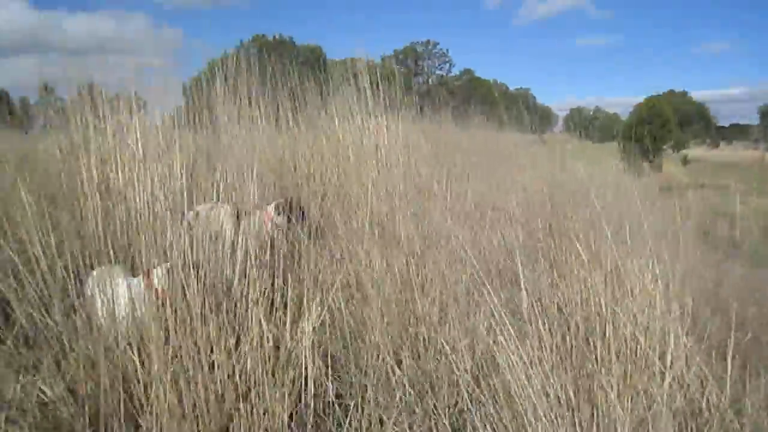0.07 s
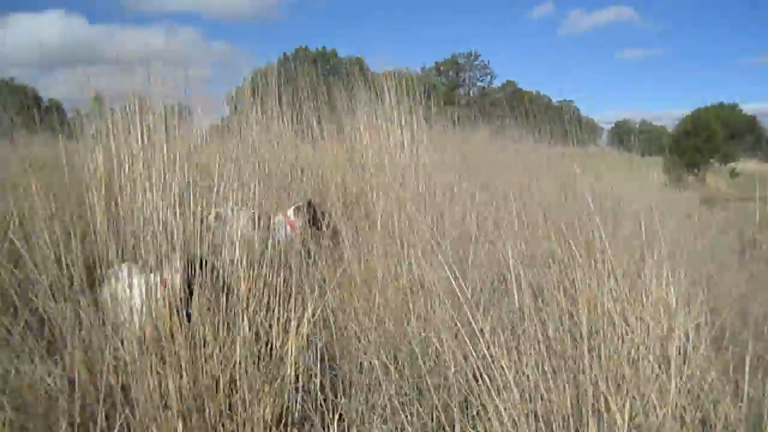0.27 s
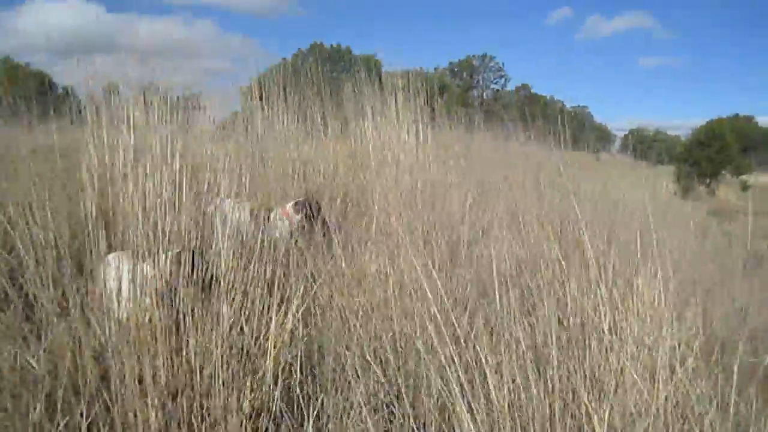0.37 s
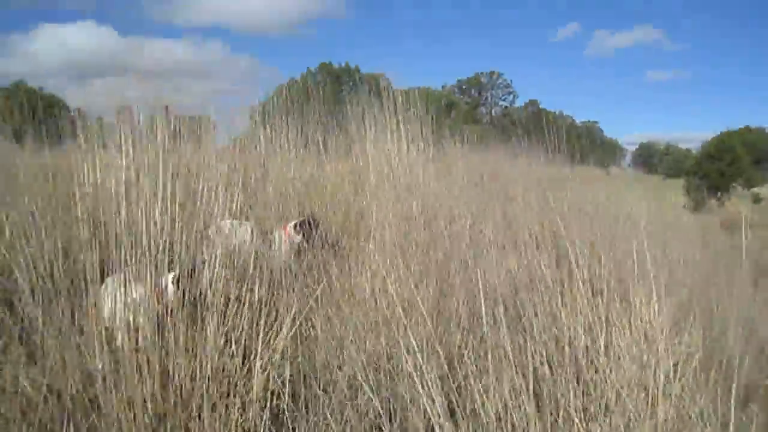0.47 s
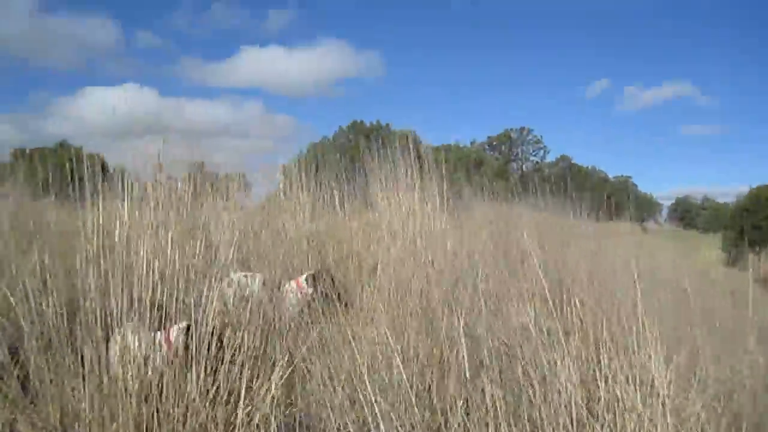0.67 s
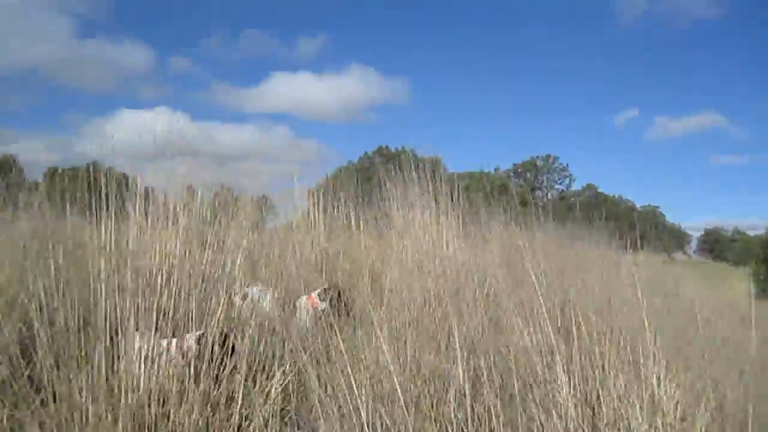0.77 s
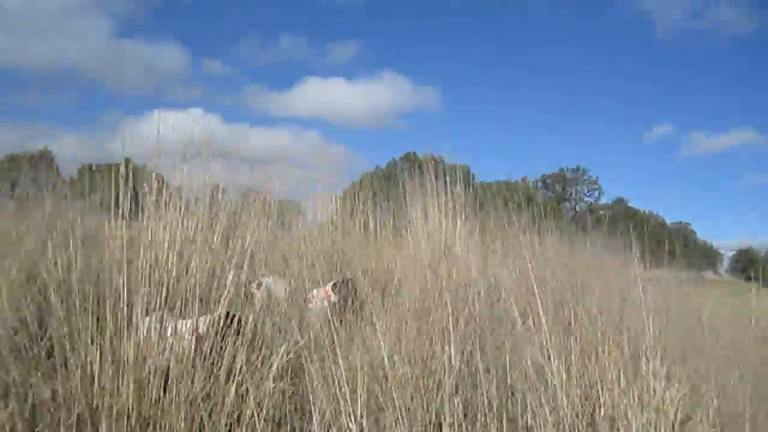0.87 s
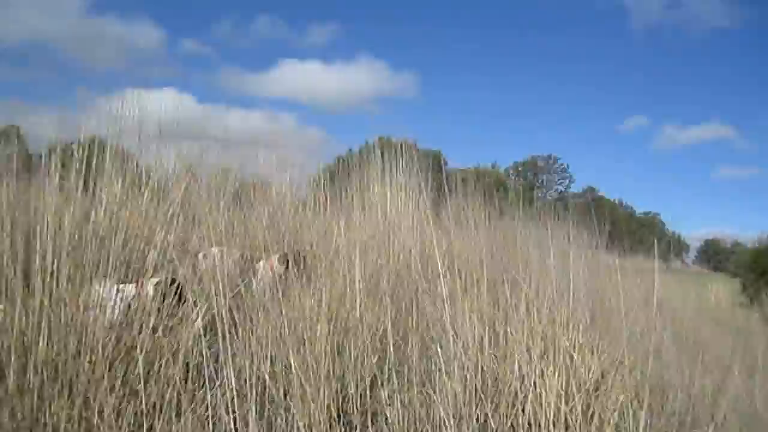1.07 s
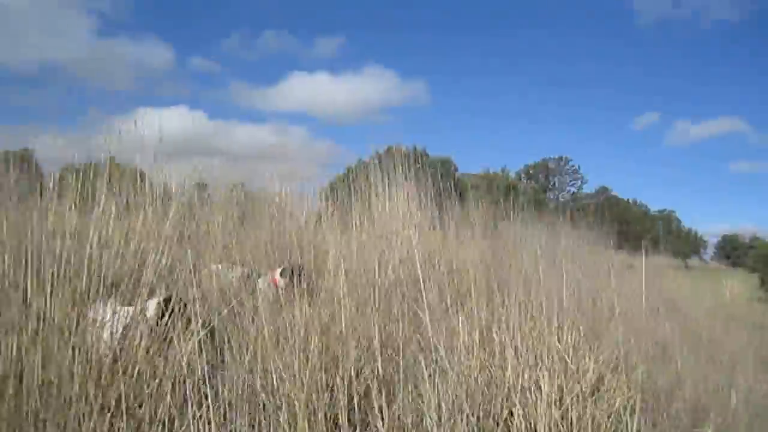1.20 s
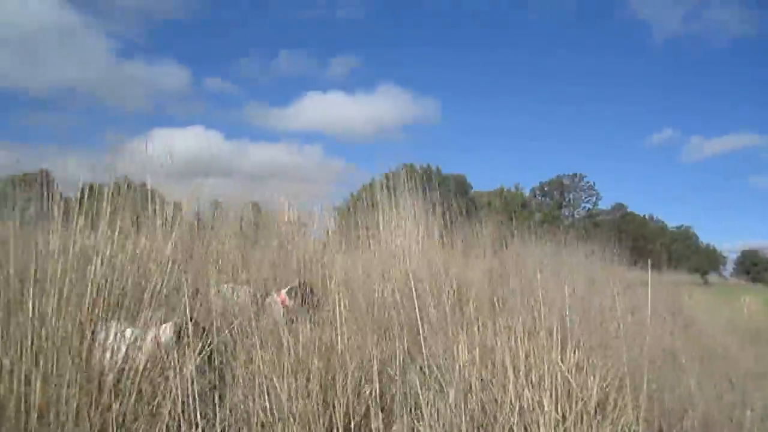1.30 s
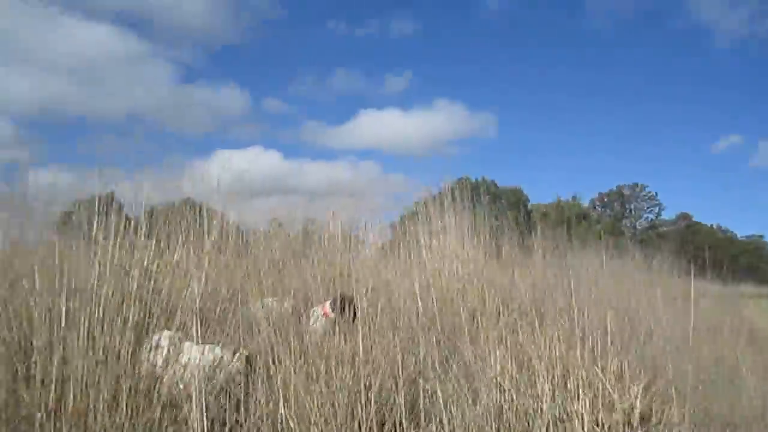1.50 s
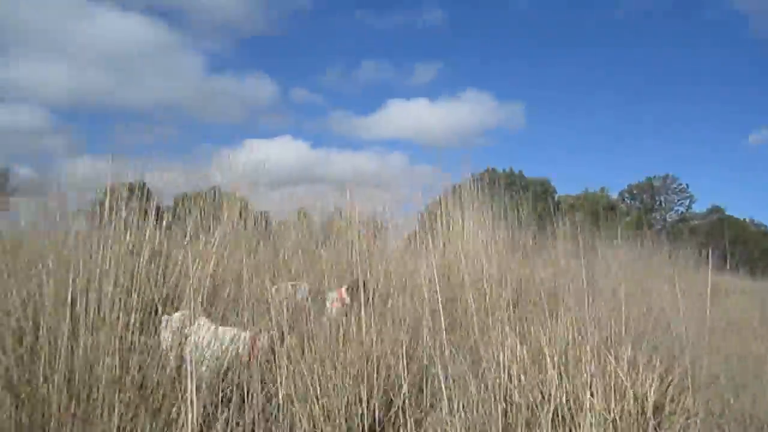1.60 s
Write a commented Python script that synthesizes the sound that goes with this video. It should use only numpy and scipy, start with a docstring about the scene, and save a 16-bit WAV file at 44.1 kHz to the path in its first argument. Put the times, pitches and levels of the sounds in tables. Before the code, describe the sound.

Wind buffets a microphone carried through tall dry grass in an open field. Stalks swish, snap and knock against the camera at first, then low, fluttering gusts come in two waves, the second stronger, before easing.

```python
"""Wind gusts break on a microphone in low, fluttering thumps: each passing eddy is a brief dip
in pressure. The microphone is on a camera carried through tall dry grass in an open field.
Behind the wind, stalks swish and dry blades crackle through countless small contacts, brittle
stalks fracture in bright snaps, and now and then a stem knocks the camera case into damped vibration."""
import sys
import numpy as np
from scipy.fft import rfft, irfft, next_fast_len
from scipy.io import wavfile
from scipy.ndimage import map_coordinates

SR = 44100
rng = np.random.default_rng(int(sys.argv[2]) if len(sys.argv) > 2 else 0)


def transcribe(signal):
    """Save signal, clipped to [-1, 1], as a 16-bit WAV file at the path in sys.argv[1]."""
    frames = np.atleast_2d(signal).T
    limited = np.clip(frames, -1, 1)
    pcm = np.round(limited * 32767).astype(np.int16)
    wavfile.write(sys.argv[1], SR, pcm)


N = 72765
T = np.arange(N) / SR

# Envelopes of the sweeping stalks and the crackling blades: time_s, relative_level_db
SWISH_ENVELOPE = [(0, -41.5), (.035, -42), (.11, -42.5), (.165, -39), (.195, -40), (.235, -40.5), (.3, -44),
                  (.45, -51), (.8, -53), (.845, -44.5), (.89, -52.5), (1.08, -46), (1.25, -50.5),
                  (1.45, -58), (1.65, -55)]
CRACKLE_ENVELOPE = [(0, -43), (.08, -45.5), (.125, -40), (.2, -50), (.4, -49.5), (.66, -51), (.8, -50.5),
                    (.92, -48), (.98, -50), (1.09, -44), (1.17, -49.5), (1.43, -53), (1.55, -52),
                    (1.65, -57)]
# Stalks breaking: start_s, relative_level_db, t60_s, pitch_hz
STALK_SNAPS = [(.0545, -22.5, 0.017, 7060), (0.109, -28.5, 0.038, 6500), (.238, -31.5, 0.045, 4100),
               (0.2564, -30, 0.011, 2500), (.346, -32, .02, 3500), (.512, -28, 0.011, 9000),
               (0.527, -36, .04, 11000), (0.62, -35, 0.027, 3900), (0.8428, -26, 0.037, 4570),
               (.917, -29.5, .035, 11000), (0.928, -27, 0.01, 7000), (1.0915, -15, 0.014, 4970),
               (1.3617, -30.5, 0.019, 9900), (1.367, -33, .02, 9400), (1.4996, -28.5, .016, 13000),
               (1.5205, -30, 0.0094, 11000)]
# Stems striking the camera: start_s, relative_level_db, most_excited_hz
STEM_KNOCKS = [(.008, -24.5, 717), (.145, -17, 505), (0.167, -23.5, 405), (.217, -25.5, 815),
               (.231, -25, 850), (.258, -18, 550), (0.293, -20, 540), (.47, -32, 445), (.997, -19.5, 830),
               (1.083, -21.5, 450), (1.481, -27, 626), (1.642, -32.5, 546)]
# Normal modes of the camera case: frequency_hz, relative_level_db, t60_s
CASE_MODES = [(216, 2.5, .05), (460, -3, 0.034), (634, -2, 0.032), (819, -6, 0.035), (1106, -6, 0.017),
              (1430, -16, 0.018)]
# Gusts on the microphone: start_s, length_s, level_db
WIND_GUSTS = [(0.153, 0.029, -33), (.232, 0.041, -29.5), (.328, 0.082, -17.5), (.547, 0.024, -28.5),
              (.598, 0.064, -24), (.705, 0.046, -33.5), (.852, .07, -17.5), (0.951, .088, -20.5),
              (1.093, 0.024, -24.5), (1.123, 0.068, -15), (1.192, 0.045, -23), (1.337, .11, -31.5),
              (1.524, 0.021, -36), (1.59, .045, -30.5)]
# The hardest eddies, each one thump: centre_s, level_db, pitch_hz
EDDY_THUMPS = [(.153, -19, 207), (.244, -13.5, 82), (0.306, -5, 140), (.331, -9.5, 188), (.342, -11, 260),
               (.389, -6.5, 302), (0.41, -10, 110), (.566, -17.5, 81), (0.615, -10, 191),
               (.651, -17.5, 167), (.865, -6.5, 224), (.879, -12.5, 110), (.904, -8, 136),
               (1.012, -13, 69.5), (1.121, -6.5, 630), (1.132, -3.5, 268), (1.15, -5, 170),
               (1.157, -6, 172), (1.179, -5.5, 342), (1.188, -7.5, 464), (1.205, -4.5, 410),
               (1.21, -8, 617), (1.23, -15.5, 457), (1.243, -14.5, 497), (1.308, -25, 248),
               (1.394, -22, 190), (1.43, -17.5, 192), (1.598, -17, 98)]
# Spectral shapes of the noise sources: frequency_hz, relative_gain_db
SWISH_SPECTRUM = [(60, -6), (200, 1.5), (450, 7), (900, 6), (1300, 2), (1800, -3), (2300, -2), (2950, -1.5),
                  (3500, -6.5), (5500, -8.5), (6500, -16.5), (16000, -31)]
CRACKLE_SPECTRUM = [(1000, -12), (3000, -4), (5000, -3.5), (8000, 1), (11500, 0), (14000, -4.5),
                    (16000, -10), (17200, -17)]
SNAP_SPECTRUM = [(300, 1.5), (900, 7.5), (1700, 3), (3000, 2), (5000, 2.5), (9000, 1.5), (13000, -1),
                 (17000, -14)]
SCRAPE_SPECTRUM = [(150, -15), (700, 0), (1500, -7), (3500, -8), (7000, -22), (16000, -32)]
RUMBLE_SPECTRUM = [(15, -12.5), (35, -2), (70, 2), (130, -6.5), (250, -10.5), (500, -23.5), (1200, -42),
                   (3000, -99)]

BAND_LIMIT_HZ = 17250
FFT_SIZE = next_fast_len(N + SR // 2)
BIN_HZ = np.fft.rfftfreq(FFT_SIZE, 1 / SR)


def amp(db):
    """Amplitude grows tenfold for every 20 dB."""
    return 10 ** (np.asarray(db) / 20)


def unit_rms(x):
    """Division by the rms gives unit power."""
    return x / np.sqrt(np.mean(x ** 2) + 1e-20)


def wobble(knots_per_s):
    """Spline interpolation of random values gives a smooth modulation."""
    return map_coordinates(rng.standard_normal(2048), [T * knots_per_s], mode="wrap")


def coloured(x, spectrum):
    """Linear filtering shapes the spectrum, with a gain that keeps the power of white noise."""
    hz, db = np.transpose(spectrum)
    gain = amp(np.interp(np.log(BIN_HZ + 1), np.log(hz), db))
    return irfft(rfft(x, FFT_SIZE) * unit_rms(gain), FFT_SIZE)[:N]


def grass_rustle(envelope, spectrum, flutter_per_s, contacts_per_s, scatter_db, contact_share):
    """Shot noise: distinct blade contacts stand out of the hiss into which countless others merge."""
    level_db = np.interp(T, *np.transpose(envelope)) + 0.65 * wobble(flutter_per_s)
    hits = rng.random(N) < contacts_per_s / SR
    contacts = hits * rng.standard_normal(N) * amp(scatter_db * np.minimum(rng.exponential(size=N), 4))
    hiss = np.sqrt(1 - contact_share) * rng.standard_normal(N)
    rustle = coloured(np.sqrt(contact_share) * unit_rms(contacts) + hiss, spectrum)
    return amp(level_db) * unit_rms(rustle)


def stalk_snaps(attack_s=0.0005, resonance_db=7, width_octaves=0.19):
    """Brittle fracture releases a short noise burst, emphasised around the stalk's own pitch."""
    out = np.zeros(N)
    hz = np.geomspace(200, BAND_LIMIT_HZ, num=60)
    base_db = np.interp(hz, *np.transpose(SNAP_SPECTRUM))
    for start_s, db, t60_s, pitch_hz in STALK_SNAPS:
        t = np.maximum(T - start_s, 0)
        burst = amp(db - 60 * t / t60_s) * (1 - np.exp(-t / attack_s)) * rng.standard_normal(N)
        peak_db = resonance_db * np.exp(-(np.log2(hz / pitch_hz) / width_octaves) ** 2)
        out += coloured(burst, np.column_stack([hz, base_db + peak_db]))
    return out


def stem_knocks(attack_s=0.00088, scrape_t60_s=0.019, fall_db_per_octave=9):
    """Impact excites the case's damped modes, most near the contact's pitch; friction adds a scrape."""
    out = np.zeros(N)
    friction = coloured(rng.standard_normal(N), SCRAPE_SPECTRUM)
    for start_s, db, contact_hz in STEM_KNOCKS:
        t = np.maximum(T - start_s, 0)
        ring = np.zeros(N)
        for hz, mode_db, t60_s in CASE_MODES:
            drive_db = rng.normal(0, 1.35) - fall_db_per_octave * abs(np.log2(hz / contact_hz))
            cycles = hz * np.exp(rng.normal(0, 0.06)) * t + rng.random()
            ring += amp(mode_db + drive_db - 60 * t / t60_s) * np.sin(2 * np.pi * cycles)
        scrape = 0.15 * amp(-60 * t / scrape_t60_s) * friction
        out += amp(db) * (ring + scrape) * (1 - np.exp(-t / attack_s))
    return out


def rumble():
    """Turbulent pressure is random, with its power concentrated at low frequencies."""
    return unit_rms(coloured(rng.standard_normal(N), RUMBLE_SPECTRUM))


def eddy(centre_s, hz, asymmetry=0.4):
    """A vortex crossing the microphone port is a pressure dip between two unequal shoulders."""
    u = np.clip(np.pi * hz * (T - centre_s), -8, 8)
    return (2 * u ** 2 - 1 + 2 * asymmetry * u) * np.exp(-u ** 2)


def eddy_train(start_s, end_s, gust_db, eddies_per_s=130, scatter_db=4, octaves_per_db=0.0624):
    """Vortex shedding makes a ragged pulse train; stronger gusts shed smaller, higher-pitched eddies."""
    hz = 133 * 2 ** (octaves_per_db * (gust_db + 21.5))  # 133 Hz for a gust of -21.5 dB
    train = np.zeros(N)
    for i, (jitter, strength, detune) in enumerate(rng.standard_normal((32, 3))):
        centre_s = start_s + (i + 0.295 * jitter) / eddies_per_s
        if centre_s < end_s:
            train += amp(scatter_db * strength) * eddy(centre_s, hz * np.exp(0.36 * detune))
    return train


def wind(breeze_db=-41.5, turbulence_db=-4.5, attack_s=0.01187, release_s=0.017):
    """Flow noise at the microphone: gusts of eddies and turbulence rise above a rumbling breeze."""
    breeze = amp(breeze_db + 2.6 * wobble(12.23)) * rumble()
    turbulence = amp(turbulence_db) * rumble()
    gusts = np.zeros(N)
    for start_s, length_s, db in WIND_GUSTS:
        end_s = start_s + length_s
        before_s, after_s = np.maximum(start_s - T, 0), np.maximum(T - end_s, 0)
        envelope = amp(-20 * (before_s / attack_s + after_s / release_s))
        eddies = envelope * eddy_train(start_s - attack_s, end_s + 2 * release_s, db)
        eddies /= np.sqrt(np.sum(eddies ** 2) / np.sum(envelope ** 2))  # same energy as the envelope
        gusts += amp(db) * (eddies + envelope * turbulence)
    thumps = sum(amp(db) * eddy(centre_s, hz) for centre_s, db, hz in EDDY_THUMPS)
    return breeze + gusts + thumps


def scene():
    """Superposition in a free field: the nearby sources add with no echo."""
    swish = grass_rustle(SWISH_ENVELOPE, SWISH_SPECTRUM, flutter_per_s=45.03,
                         contacts_per_s=1800, scatter_db=2.5, contact_share=0.34)
    crackle = grass_rustle(CRACKLE_ENVELOPE, CRACKLE_SPECTRUM, flutter_per_s=90,
                           contacts_per_s=900, scatter_db=1.5, contact_share=0.21)
    grass = amp(5.5) * swish + amp(0.5) * crackle
    return (grass + amp(-3) * stalk_snaps() + amp(3) * stem_knocks() + wind())[None]


def record(dry):
    """Band-pass response: the camera loses the deepest bass and everything above its band limit."""
    high_pass = BIN_HZ / np.hypot(BIN_HZ, 18)  # first order, corner at 18 Hz
    return irfft(rfft(dry, FFT_SIZE) * high_pass * (BIN_HZ < BAND_LIMIT_HZ), FFT_SIZE)[:, :N]


dry = scene()
out = record(dry)
transcribe(out)
```